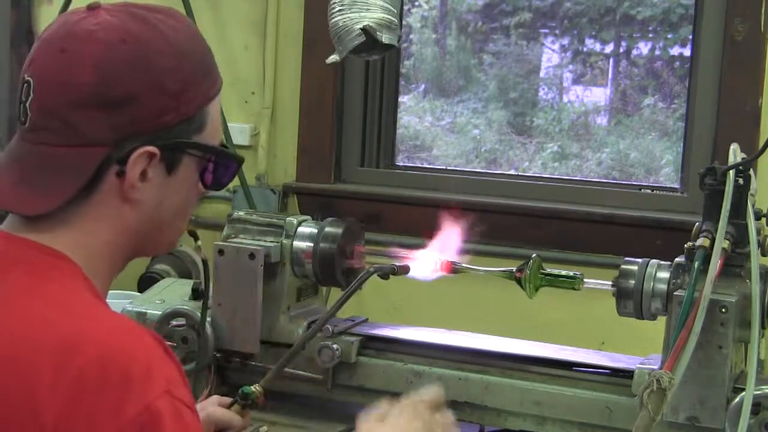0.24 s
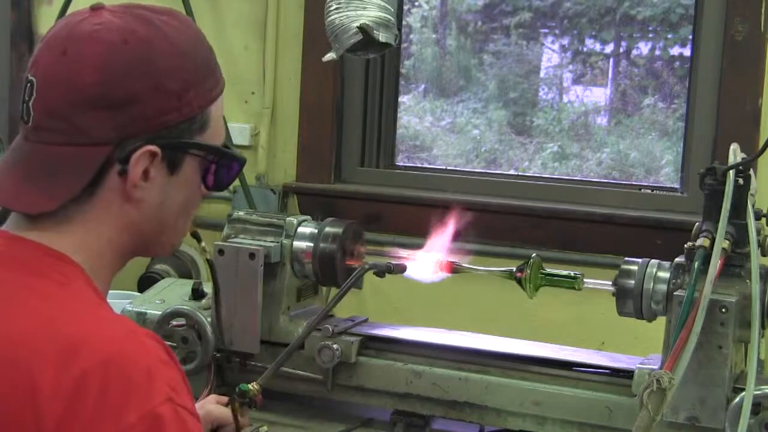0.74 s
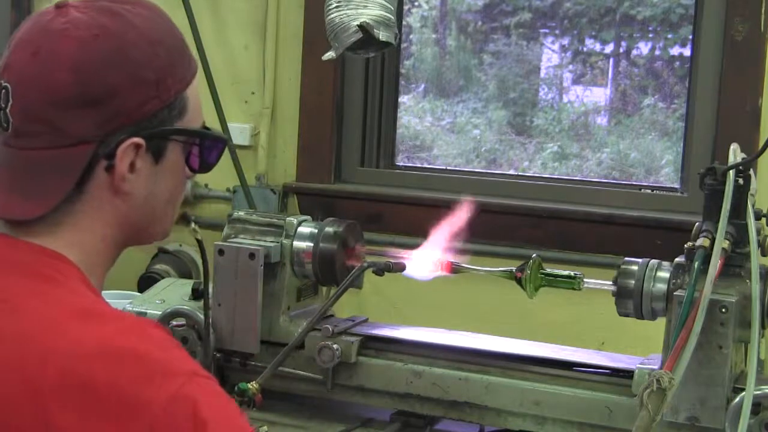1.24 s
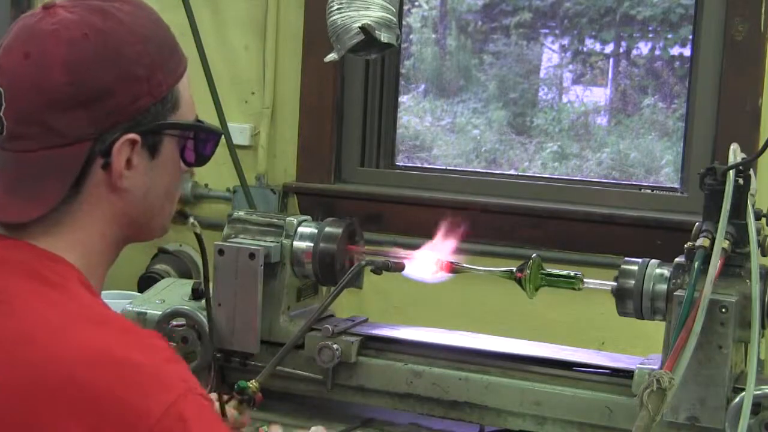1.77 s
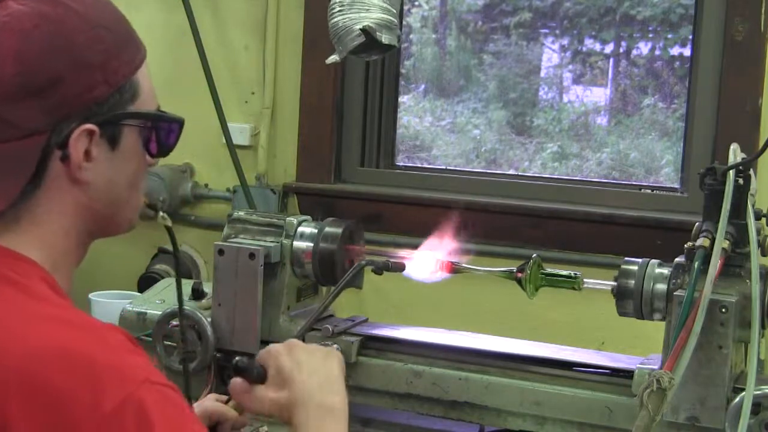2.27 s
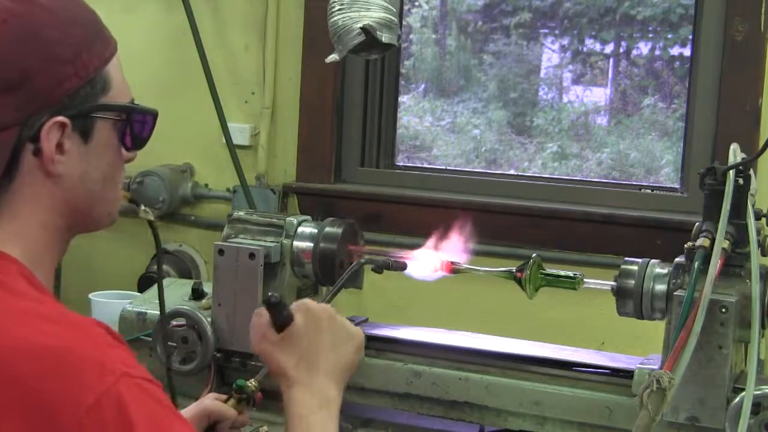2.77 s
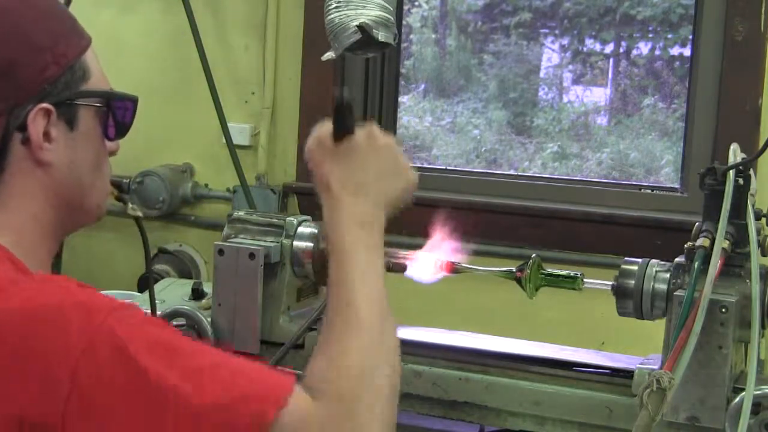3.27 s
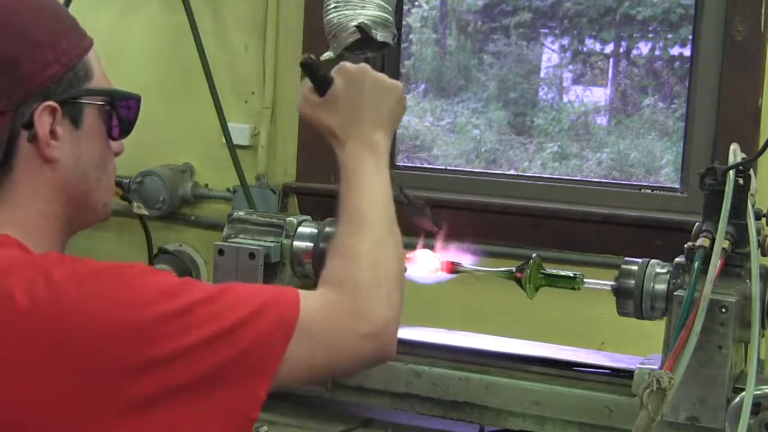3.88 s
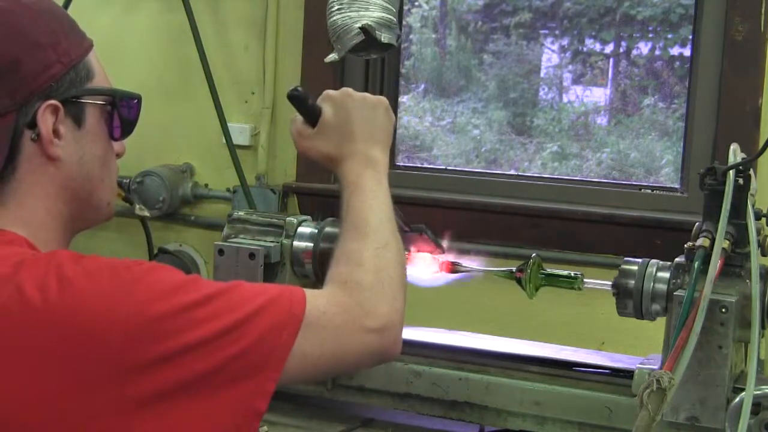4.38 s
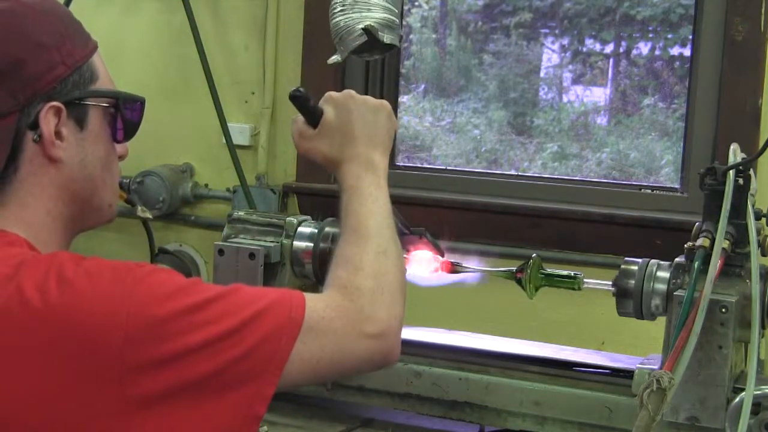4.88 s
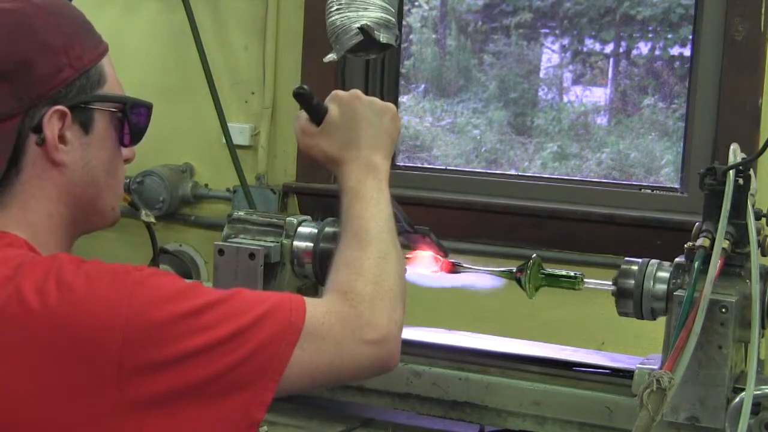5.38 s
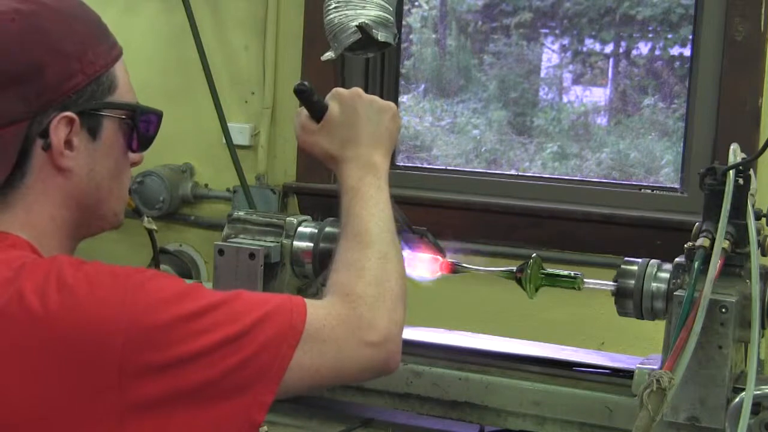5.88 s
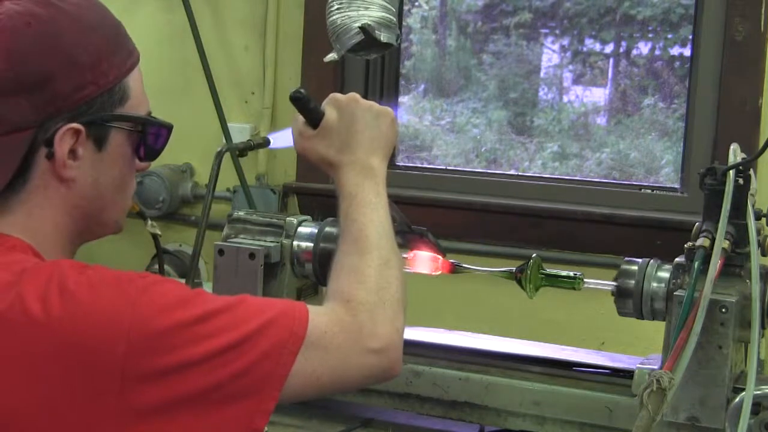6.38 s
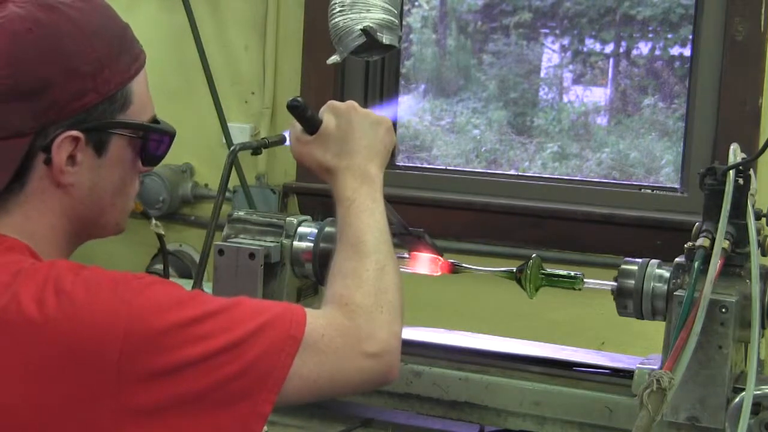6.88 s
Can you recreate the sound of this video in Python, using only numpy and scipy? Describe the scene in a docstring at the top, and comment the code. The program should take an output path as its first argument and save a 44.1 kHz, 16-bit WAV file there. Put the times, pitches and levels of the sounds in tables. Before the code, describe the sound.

Steady rushing hiss of a gas torch flame heating glass, its tone shifting slightly as it moves, over a faint machine hum.

```python
"""In a small workshop, a hand-held gas torch hisses and roars on glass that turns in a lathe.
Swirling gas makes the noise: big swirls rumble, the flame roars and the nozzle hisses.
The flame licks the glass from below and flares twice, then is turned along it and at last lifted clear.
Bench, window and walls colour the hiss differently at each place.
Faintly underneath, the lathe hums and the room rings at two low pitches."""
import sys
import numpy as np
from scipy import signal
from scipy.fft import rfft, irfft, next_fast_len
from scipy.io import wavfile
from scipy.ndimage import map_coordinates

SR = 44100
rng = np.random.default_rng(int(sys.argv[2]) if len(sys.argv) > 2 else 0)


def inscribe(sig):
    """Save sig as 16-bit PCM at rate SR to the path in sys.argv[1].

    A 1-D sig is mono; a 2-D sig holds one channel per row.
    Samples are clipped to [-1, 1] before scaling.
    """
    pcm = np.round(np.clip(np.atleast_2d(sig).T, -1, 1) * 32767)
    wavfile.write(sys.argv[1], SR, pcm.astype(np.int16))


N = 314433

# the lathe's hum near 100 Hz, then two ringing pitches of the room: f/Hz, level/dB
LOW_TONES = [(97, -53.5), (158, -48), (232, -49)]
# pitches that bench and walls boost or weaken, wherever the torch is: f/Hz, width/Hz, gain/dB
ROOM_PEAKS = [(118, 30, -2.0), (151, 30, 4.6), (194, 30, -4.7), (258, 80, 1.8), (366, 80, -2.6),
              (463, 130, 1.5), (624, 50, 3.7), (689, 80, -4.4), (797, 30, -2.9), (1034, 50, -4.6),
              (1303, 30, 4.4), (1443, 80, 4.2), (1497, 30, -4.0), (1680, 50, 4.2), (2046, 50, 3.9),
              (2175, 50, 4.2), (2293, 50, -4.3), (3628, 80, 3.4), (3790, 80, -3.8), (4619, 80, -3.9),
              (5566, 130, 3.2), (7913, 400, -2.3)]
# more peaks and dips with the flame under, along or clear of the glass: f/Hz, width/Hz, gain/dB
PEAKS_UNDER = [(571, 30, 3.8), (775, 30, 2.1), (904, 110, 2.9), (1163, 30, 4.7), (1561, 45, 3.6),
               (1615, 30, -3.7), (1938, 110, -4.3), (2003, 45, 3.7), (2099, 45, -3.7), (2369, 45, 3.5),
               (2519, 45, 3.6), (2584, 45, -4.4), (2670, 70, 4.0), (3101, 170, -2.6), (3230, 70, 3.3),
               (3876, 70, 4.6), (4177, 70, 5.5), (4382, 70, 3.3), (4479, 110, 3.7), (4845, 170, -4.1),
               (7192, 170, 2.2), (10487, 170, 4.1), (10680, 170, 3.3), (12252, 260, 2.4)]
PEAKS_ALONG = [(452, 45, 4.2), (571, 30, 3.7), (926, 110, 5.0), (980, 30, 2.6), (1120, 45, -3.3),
               (1163, 30, 3.1), (1357, 70, -4.3), (1690, 45, 2.8), (1766, 70, -2.8), (1884, 260, -3.9),
               (1970, 45, -3.6), (2013, 45, 2.8), (2164, 45, 3.3), (2821, 260, 2.3), (3510, 110, -4.9),
               (3682, 70, -3.7), (3736, 70, 3.0), (4307, 70, -4.0), (4533, 70, 6.4), (4737, 110, 3.5),
               (5125, 110, -4.1), (6568, 110, 4.3), (8549, 170, 2.9), (8979, 170, 4.5), (10142, 170, 4.7),
               (12188, 260, 3.2)]
PEAKS_CLEAR = [(409, 70, 4.5), (506, 70, 7.1), (754, 45, -3.0), (797, 30, 3.0), (915, 45, -5.3),
               (1001, 70, 3.6), (1087, 70, 2.8), (1260, 45, 2.5), (1443, 170, 4.0), (1486, 45, 2.9),
               (1529, 30, -4.3), (1658, 110, -3.6), (1873, 30, -6.3), (1927, 45, 5.4), (2121, 400, -2.3),
               (2659, 70, -3.9), (4027, 110, 3.1), (5340, 110, 5.0), (5491, 170, -3.8), (7084, 110, 3.6),
               (7343, 260, 3.1), (11542, 400, 2.3)]
# left and right differ faintly in a limited band of pitches: f/Hz, level/dB
SIDE_SPECTRUM = [(450, -72), (750, -54), (1020, -50), (1220, -5), (1380, -42), (2100, -26), (2400, -14.5),
                 (3300, -18), (3800, -9), (4100, -73.5)]
# where the torch points: t/s, place (0 under the glass, 1 along it, 2 lifted clear)
TORCH_PATH = [(0, 0), (3.55, 0), (4.25, 1), (5.95, 1), (6.25, 2), (7.13, 2)]
# the moments when the flame flares up: t/s, level/dB, half length/s
FLARE_TIMES = [(1.8, -21.5, 0.059), (2.174, -16.5, .025)]
# how strong each pitch is in a flare: f/Hz, level/dB
FLARE_SPECTRUM = [(200, -28), (400, -11), (620, 0.5), (1100, -1.5), (1700, -1.5), (2900, -6.5), (4500, -13),
                  (10000, -21)]
# how strong each pitch is in the gas jet, before each band gets its own level: f/Hz, level/dB
JET_SPECTRUM = [(30, -37), (50, -28), (100, -16), (230, -9.5), (500, -4.5), (900, -2), (1150, -8.5),
                (1600, -0.8), (2400, -1.0), (3500, -4.5), (4500, -0.5), (7000, -4.5), (10500, -8),
                (12400, -10.5)]
# how loud the flame is at each place: place, rumble/dB, roar/dB, hiss/dB
FLAME_LEVELS = [(0, -37.5, -21, -17), (1, -33, -21, -17.5), (2, -35, -21.5, -17.5)]
# the hiss dulls briefly as the torch swings round: t/s, half length/s, loss at the top/dB
SWING_DIP = (4.3, .25, 1.3)

SIZZLE_DB = -4.2  # the top of the hiss, next to the lower hiss
SWING_SHARE = 0.26  # the part of the swing's loss that the lower hiss gets
BUFFET_GROWTH = 1.2  # dB of deep buffeting for each dB of rumble
SETTLE_S = .3  # how long the rumble lags behind a move of the torch
TOP_HZ = 12500


def amp(db):
    """Turn decibels into a number to multiply by."""
    return 10 ** (np.asarray(db) / 20)


def unit(x):
    """Scale a sound to an average strength (rms) of 1."""
    return x / np.sqrt(np.mean(x ** 2) + 1e-20)


def gain_at(points, hz):
    """Read a gain between the points of an f/Hz, level/dB table, on a log pitch scale."""
    freqs, levels_db = np.transpose(points)
    return amp(np.interp(np.log(hz + 1), np.log(freqs + 1), levels_db))


def wobble(rate):
    """A smooth random curve through rate new values a second."""
    values = rng.standard_normal(int(N * rate / SR) + 4)
    return map_coordinates(values, [np.arange(N) * rate / SR])


def bell(centre_s, half_s):
    """A smooth swell from 0 to 1 and back."""
    return np.exp(-.5 * ((np.arange(N) / SR - centre_s) / half_s) ** 2)


def filtered(x, response):
    """Turn each frequency in x up or down by the gain response(hz)."""
    size = next_fast_len(N + SR // 4)
    return irfft(rfft(x, size) * response(np.fft.rfftfreq(size, 1 / SR)), size)[..., :N]


def torch_place():
    """Where the torch is at every sample, from 0 (under the glass) to 2 (clear)."""
    times, places = np.transpose(TORCH_PATH)
    return np.interp(np.arange(N) / SR, times, places)


def lathe_and_room_tones(waver_db):
    """Low wavering tones: the lathe's hum near 100 Hz and two ringing pitches of the room."""
    t = np.arange(N) / SR
    tones = np.zeros(N)
    for hz, db in LOW_TONES:
        strength = np.sqrt(2) * amp(db + waver_db * wobble(3.93))
        tones += strength * np.sin(2 * np.pi * hz * t + 2.07 * wobble(7))
    return tones


def resonate(x, peaks):
    """Nearby surfaces boost some pitches and weaken others."""
    grid = np.linspace(0, SR / 2, 8192)
    db = sum(gain / (1 + (2 * (grid - hz) / width) ** 2) ** 2 for hz, width, gain in peaks)
    return filtered(x, lambda hz: amp(np.interp(hz, grid, db)))


def echoes(x, echo_db, fade_s, delay_s):
    """Mix in delayed copies of x, mostly above the bass, that die away by 60 dB in fade_s."""
    t = np.arange(SR // 5) / SR
    tail = rng.standard_normal(len(t)) * amp(-60 * t / fade_s) * (t > delay_s)
    echo = signal.fftconvolve(x, tail / np.linalg.norm(tail))[:N]
    share = lambda hz: np.clip(amp(echo_db) * hz / np.hypot(hz, 900), 0, .9)
    direct = filtered(x, lambda hz: np.sqrt(1 - share(hz) ** 2))
    return direct + filtered(echo, share)


def workshop(flame):
    """Each place of the torch has its own wall echoes; they blend as the hand moves."""
    place = torch_place()
    flame = resonate(flame, ROOM_PEAKS)
    heard = np.zeros(N)
    for index, peaks in enumerate([PEAKS_UNDER, PEAKS_ALONG, PEAKS_CLEAR]):
        nearness = np.clip(1 - abs(place - index), 0, 1)
        heard += nearness * echoes(resonate(flame, peaks), echo_db=-5.5, fade_s=0.19, delay_s=.005)
    return heard


def flares():
    """Short soft whooshes as the flame spills round the glass."""
    swell = sum(amp(db) * bell(centre_s, half_s) for centre_s, db, half_s in FLARE_TIMES)
    whoosh = filtered(rng.standard_normal(N), lambda hz: gain_at(FLARE_SPECTRUM, hz))
    return swell * unit(whoosh)


def jet_band(low_hz, high_hz):
    """The noise of swirling gas between two pitches, at strength 1."""
    noise = rng.standard_normal(N)
    return unit(filtered(noise, lambda hz: gain_at(JET_SPECTRUM, hz) * (hz >= low_hz) * (hz < high_hz)))


def flame_levels():
    """Rumble, roar and hiss in dB; the flame rumbles more, a little late, as it runs free of the glass."""
    place = torch_place()
    places, rumble_db, roar_db, hiss_db = np.transpose(FLAME_LEVELS)
    step = 1 / (SETTLE_S * SR)
    late_place = signal.lfilter([step], [1, step - 1], place)
    return (np.interp(late_place, places, rumble_db),
            np.interp(place, places, roar_db),
            np.interp(place, places, hiss_db))


def torch(flutter_db, lumps_db, shimmer_db, buffet_db, surge_db, sway_db):
    """Big swirls of gas buffet and rumble, the flame's front roars and the nozzle hisses."""
    rumble_db, roar_db, hiss_db = flame_levels()
    buffet, rumble, roar = jet_band(24, 70), jet_band(70, 360), jet_band(360, 2500)
    hiss, sizzle = jet_band(2500, 7500), jet_band(7500, 13000)
    # the flame flutters quickly and sways slowly in the hand
    flutter, sway = wobble(15), sway_db * wobble(3.85)
    swing_s, swing_half_s, loss_db = SWING_DIP
    dull_db = loss_db * bell(swing_s, swing_half_s)
    # the biggest swirls are the least steady, and grow most as the flame runs free
    growth_db = BUFFET_GROWTH * (rumble_db - rumble_db.mean())
    buffet = unit(buffet * amp(growth_db + lumps_db * wobble(13))) * amp(buffet_db)
    rumble *= amp(rumble_db + surge_db * wobble(7))
    roar *= amp(roar_db + sway + flutter_db * flutter)
    hiss *= amp(hiss_db + sway - SWING_SHARE * dull_db + shimmer_db * flutter)
    sizzle *= amp(hiss_db + SIZZLE_DB + sway - dull_db + shimmer_db * wobble(14))
    return buffet + rumble + roar + hiss + sizzle


def scene():
    """Torch and lathe in the room; left and right differ faintly in a limited band."""
    flame = torch(flutter_db=0.38, lumps_db=2.5, shimmer_db=0.32, buffet_db=-56, surge_db=0.4, sway_db=0.14)
    flame += flares()
    middle = workshop(flame) + lathe_and_room_tones(waver_db=3.5)
    delayed = np.roll(middle, SR // 150)
    smeared = echoes(delayed, echo_db=-1.0, fade_s=0.21, delay_s=0.0046)
    side = filtered(smeared, lambda hz: gain_at(SIDE_SPECTRUM, hz))
    return np.array([middle + side, middle - side])


def record(dry):
    """Cut away the very highest pitches, from TOP_HZ up."""
    return filtered(dry, lambda hz: hz < TOP_HZ)


dry = scene()
out = record(dry)
inscribe(out)
```